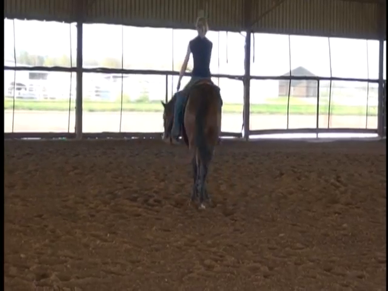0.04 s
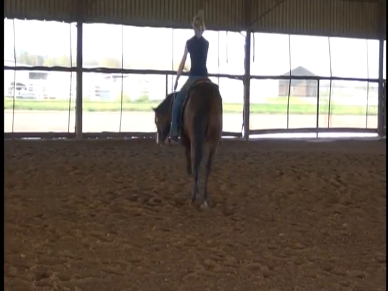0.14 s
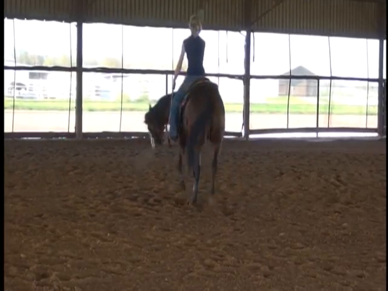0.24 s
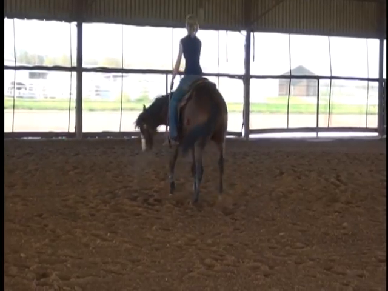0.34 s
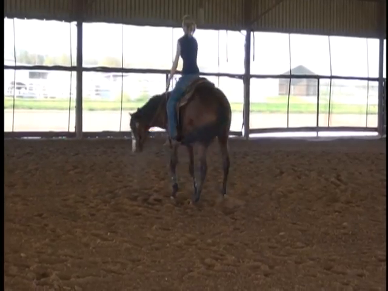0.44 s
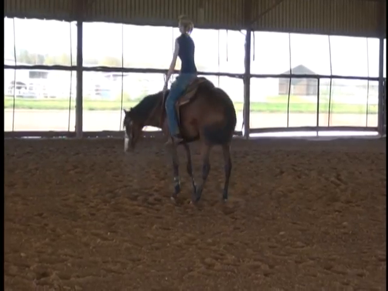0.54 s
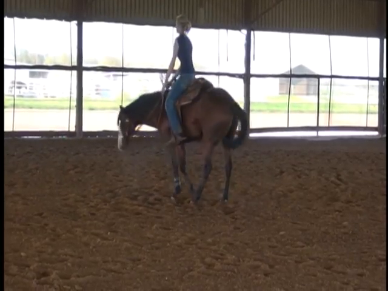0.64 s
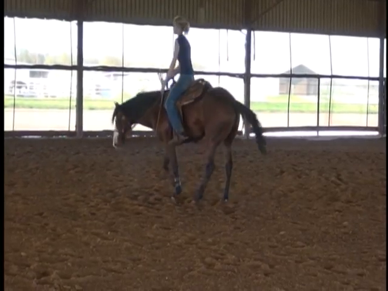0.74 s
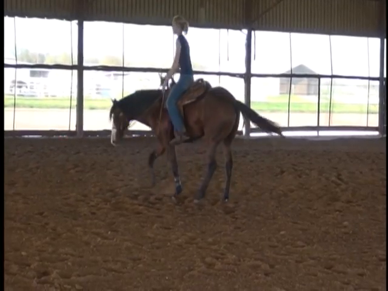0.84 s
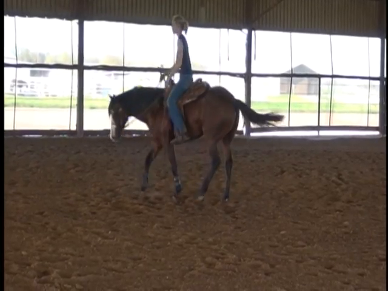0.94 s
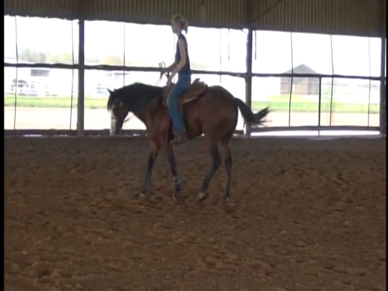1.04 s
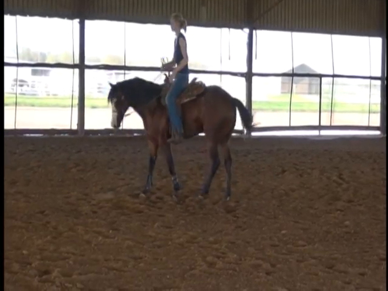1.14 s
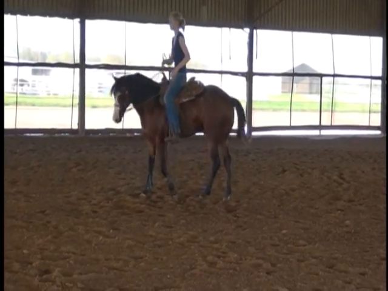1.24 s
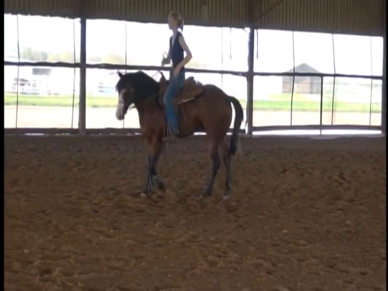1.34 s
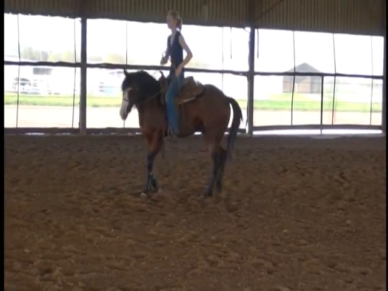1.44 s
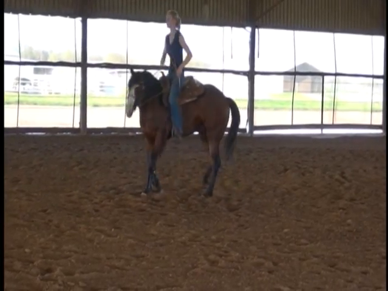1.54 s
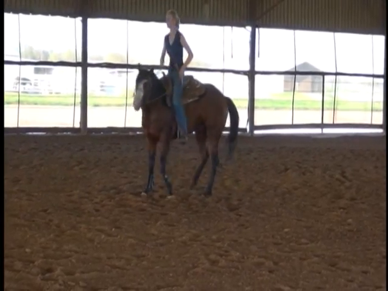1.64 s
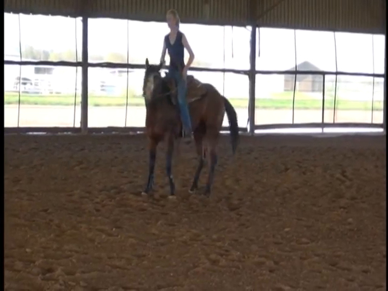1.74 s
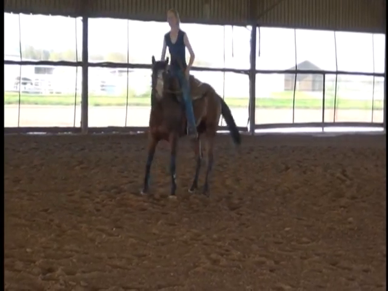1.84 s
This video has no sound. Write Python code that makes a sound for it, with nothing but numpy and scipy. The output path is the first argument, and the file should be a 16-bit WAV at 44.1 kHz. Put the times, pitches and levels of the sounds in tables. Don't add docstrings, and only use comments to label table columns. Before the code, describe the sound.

One rapid, rattling horse snort with a short roof echo, heard from several metres in a covered arena. Quiet bit and buckle clinks come before and after, with faint sparrow chirps later over low traffic and wind.

```python
import sys
import numpy as np
from scipy import signal
from scipy.fft import rfft, irfft
from scipy.io import wavfile
from scipy.ndimage import uniform_filter1d, map_coordinates

SR = 44100
rng = np.random.default_rng(int(sys.argv[2]) if len(sys.argv) > 2 else 0)


def output_pcm(signal):
    pcm = np.clip(np.atleast_2d(signal).T, -1, 1) * 32767
    wavfile.write(sys.argv[1], SR, np.round(pcm).astype(np.int16))


def to_linear_factor(level_db):
    exponent = np.asarray(level_db, float) / 20
    return 10 ** exponent


N = 83790
T = np.arange(N) / SR

# pitch_hz, level_db (per Hz)
AIR_SPECTRUM = [(15, -14), (25, -16.5), (134, 3), (427, -5.5), (591, -1.5), (1160, 1.5), (4250, -21.5),
                (9840, -32.5), (16000, -26.5)]
# pitch_hz, width_hz, lift_db
AIR_RESONANCES = [(277, 62, -7), (6300, 440, 7.5), (9750, 2000, 0)]
# pitch_hz, level_db
AIR_SIDE_SPECTRUM = [(60, -47), (110, -62), (200, -40), (380, -26.5), (700, -15.5), (1290, -11.5),
                     (2380, -10), (4400, -8), (8120, -4.5), (15000, -13)]
# pitch_hz, level_db
MIX_RESPONSE = [(30, -10), (55, 0), (15780, 0), (15900, -60)]
# pitch_hz, level_db
MIC_SIDE_RESPONSE = [(100, -16), (250, -36), (600, -7.5), (1500, 1), (5000, 6), (9000, 0)]
# pitch_hz, t60_s
ARENA_DECAY = [(120, 1.06), (250, 0.93), (600, 1.02), (1500, 0.43), (4000, 0.89), (7000, 0.31),
               (10000, 0.068)]
# start_s, length_s, level_db, start_hz, end_hz
SPARROW_CHIRPS = [(1.049, 0.013, -68, 4160, 4100), (1.053, 0.02, -68.5, 4140, 3590),
                  (1.11, 0.029, -71, 3140, 3000), (1.16, 0.019, -72, 3570, 3420),
                  (1.552, 0.014, -72, 3730, 3770), (1.71, .015, -74, 4230, 4250),
                  (1.729, 0.013, -72, 3570, 3450), (1.775, .022, -67, 4040, 3840),
                  (1.797, 0.016, -63.5, 3500, 3400), (1.81, 0.029, -74, 2500, 3280),
                  (1.838, 0.023, -68, 3250, 4450), (1.86, 0.017, -66, 4470, 4500),
                  (1.88, .015, -61.5, 3800, 3470), (1.892, .012, -66, 3500, 2800),
                  (1.79, 0.14, -76.5, 5330, 5460), (1.845, 0.0085, -67, 2960, 2800)]
# pitch_hz, t60_s
BIT_RINGS = [(5950, 0.13), (9110, 0.034), (11540, 0.13), (12650, 0.043)]
# start_s, (level_db of each ring)
BIT_JINGLES = [(0.161, -64, -60, -59, -63), (0.202, -83, -62, -63, -86), (0.675, -85, -64, -75, -88),
               (.715, -85, -85, -83, -88), (.75, -91, -90, -83, -88), (.785, -68, -63.5, -78, -76),
               (.898, -77, -70, -77, -91), (.908, -97, -63, -78, -74), (1.42, -91, -72, -86, -83),
               (1.79, -88, -71, -84, -88), (1.83, -81, -75, -71, -88), (1.86, -88, -88, -72, -88),
               (1.886, -86, -88, -70, -88)]
# start_s, level_db, low_ring_hz, high_ring_hz, rattle_s
TACK_TICKS = [(.0857, -62, 4940, 8950, 0.0077), (0.089, -57, 5800, 8500, 0.0022),
              (.095, -65.5, 5070, 6000, 0.021), (.988, -73, 5900, 9500, 0.0022),
              (1.1857, -52.5, 6200, 11800, 0.0016), (1.1864, -55.5, 11800, 12000, 0.0019),
              (1.186, -60, 4660, 9000, 0.0022), (1.188, -68, 8100, 14200, .0015),
              (1.19, -81, 6360, 11900, 0.051), (1.24, -75, 5060, 6160, 0.048),
              (1.565, -77, 3200, 5600, .03), (1.661, -65, 6300, 11600, 0.0049),
              (1.669, -67, 6300, 9150, 0.005), (1.705, -74.5, 6300, 5200, 0.13),
              (1.72, -67, 6350, 9400, 0.0085), (1.742, -71, 6040, 5230, 0.024),
              (1.83, -71, 6500, 7400, .003)]
# time_s, peak_db, pitch_hz
RIM_CRACKS = [(0.2049, -37, 1320), (0.2154, -23.5, 1940), (0.2468, -27.5, 1270), (0.2861, -19.5, 1730),
              (0.3098, -23, 1650), (0.3199, -17, 1410), (0.3348, -28, 1540), (0.36, -18, 1480),
              (0.3854, -16.5, 1800), (0.4121, -22.5, 1630), (0.4394, -22, 1440), (0.4522, -20.5, 980),
              (0.4651, -18.5, 1160), (0.4932, -20, 1260), (0.5227, -18.5, 1520), (0.5527, -29, 1370),
              (0.5807, -29, 1040), (0.5881, -28, 1180), (0.6078, -39, 1180), (0.6173, -25.5, 1360),
              (0.6453, -37, 1220), (0.6832, -38, 1140), (0.6931, -32, 1280)]
# time_s, peak_db, pitch_hz, length_s
WET_SPITS = [
    (0.232, -55.5, 9600, 0.0028),
    (0.347, -41, 7200, 0.0014),
    (.422, -44.5, 7300, 0.0012),
    (0.53, -49, 4860, 0.0023),
    (0.558, -48.5, 5000, 0.0015),
    (0.653, -53, 4670, 0.0029),
    (0.567, -44, 8400, 0.0011),
    (.686, -65, 7900, 0.0019),
    (.687, -59.5, 11000, 0.0026),
    (.696, -59, 7200, 0.002),
]
# time_s, effort_db, jet_brightness_db, chest_db, chest_deep_db
BLOW_COURSE = [
    (0.159, -65, 2, -24, 6.5),
    (0.191, -47.5, -8, -20, 2),
    (0.23, -39.5, -4.5, -18, 2.5),
    (0.281, -36.5, -1, -16.5, 0.5),
    (.46, -39.5, 1.5, -12.5, -2),
    (.55, -40.5, 2, -11.5, -3),
    (0.626, -42, 2.5, -13.5, -3.5),
    (0.689, -55.5, 0.5, -7.5, -6),
    (0.739, -62, -15, 0, -1.5),
]
# time_s, flaps_per_s
FLAP_RATE = [(.15, 40.5), (.42, 39), (.51, 33), (.75, 31.5)]
# time_s, share of full flutter depth
NOSTRIL_LOOSENESS = [(.2, .35), (.3, .65), (.44, .75), (.48, 1.15), (.7, .95)]
# time_s, delay_ms
JET_ECHO_DELAY = [(.2, 0.36), (.37, 0.3), (.7, 0.302)]
# pitch_hz, level_db (per Hz)
NOSE_SPECTRUM = [(150, -52), (300, -9.5), (559, -12), (823, -3.5), (1170, -4), (2400, -7), (4000, -25),
                 (8800, -83)]
# pitch_hz, width_hz, lift_db
NASAL_CAVITIES = [(379, 73, -0.5), (480, 100, 4), (744, 23, 7.5), (838.4, 33, 8), (1040, 90, 4),
                  (1171, 73, 9.5), (1458, 80, 6), (1650, 60, 4), (2256, 74, 4)]
# pitch_hz, level_db (per Hz)
JET_SPECTRUM = [(1500, -8), (3000, 0.5), (5000, -3.5), (8500, -6), (11500, -7), (14000, -18), (16000, -23)]
# pitch_hz, width_hz, lift_db
JET_RESONANCES = [(4830, 610, 1.5), (8800, 370, 5.5)]
# pitch_hz, width_hz, level_db
CHEST_RESONANCES = [(107, 42, -7), (140.4, 23.4, 0), (163, 27, 3.5), (252, 45, 4)]


def unit(x):
    return x / np.sqrt(np.mean(x ** 2))


def noise():
    return rng.standard_normal(N)


def on_log(hz, table):
    table = np.array(table)
    return np.interp(np.log(hz), np.log(table[:, 0]), table[:, 1])


def colour(x, table, lifts=()):
    hz = np.arange(4097) * SR / 8192 + 1
    gain_db = on_log(hz, table)
    for centre, width, db in lifts:
        gain_db = gain_db + db / (1 + (2 * (hz - centre) / width) ** 2)
    cepstrum = irfft(gain_db * np.log(10) / 20)
    cepstrum[1:4096] *= 2
    cepstrum[4097:] = 0
    impulse = irfft(np.exp(rfft(cepstrum)))[:4096]
    return signal.fftconvolve(x, impulse)[:N]


def ring(x, hz, width_hz):
    return signal.lfilter(*signal.iirpeak(hz, hz / width_hz, SR), x)


def ring_twice(x, hz, width_hz):
    return ring(ring(x, hz, width_hz), hz, width_hz)


def walk(rate):
    k = int(SR / rate)
    steps = np.repeat(rng.standard_normal(N // k + 1), k)
    return 1.3 * uniform_filter1d(uniform_filter1d(steps, k), k)[:N]


def pulse(time_s, length_s):
    return np.exp(-((T - time_s) / length_s) ** 2)


def air():
    level_db, swell_db, flicker_db = -58.5, .5, 1.1
    steady = unit(colour(noise(), AIR_SPECTRUM, AIR_RESONANCES))
    swell = walk(0.67)
    mid = np.zeros(N)
    for hz in 30 * 2 ** np.arange(0, 9.4, .5):
        mid += ring(steady, hz, hz * .5) * to_linear_factor(swell_db * swell + flicker_db * walk(9.8))
    side = colour(unit(colour(noise(), AIR_SPECTRUM)), AIR_SIDE_SPECTRUM)
    return to_linear_factor(level_db) * np.array([unit(mid), side])


def camera():
    line_hz, field_hz, buzz_start_s = 15734, 59.94, 0.0096
    whine_db, buzz_db, hum_db = -87, -84, -78
    gate = np.exp(-((T - buzz_start_s) * field_hz % 1) / 0.17)
    buzz = unit(ring_twice(gate * noise(), 15500, 630))
    whine = np.sin(2 * np.pi * line_hz * T) * (1 + 0.98 * gate)
    hum = np.sin(2 * np.pi * field_hz * T)
    return to_linear_factor(whine_db) * whine + to_linear_factor(buzz_db) * buzz + to_linear_factor(hum_db) * hum


def arena(x):
    wet_db, side_db, predelay_s = -9, -15, 0.016
    tail = 0
    for hz in 88 * 2. ** np.arange(8):
        band = ring(rng.standard_normal((2, N)), hz, hz * .8)
        tail = tail + band * to_linear_factor(-60 * T / on_log(hz, ARENA_DECAY))
    tail = tail * (T > predelay_s)
    tail = tail / np.sqrt(np.sum(tail[0] ** 2))
    echo = signal.fftconvolve(x[None], tail, axes=1)[:, :N]
    return echo * to_linear_factor(np.array([[wet_db], [wet_db + side_db]]))


def sparrows():
    out = np.zeros(N)
    for start, length, db, start_hz, end_hz in SPARROW_CHIRPS:
        progress = np.clip((T - start) / length, 0, 1)
        hz = start_hz + (end_hz - start_hz) * progress + 30 * walk(270)
        whistle = np.sin(2 * np.pi * np.cumsum(hz) / SR)
        out += to_linear_factor(db + 2.1 * walk(200)) * np.sin(np.pi * progress) ** 0.15 * whistle
    return out


def tack():
    out = np.zeros(N)
    for start, *levels_db in BIT_JINGLES:
        age = np.clip(T - start, 0, None)
        attack = (T > start) * np.minimum(age / .0012, 1)
        for (hz, t60), db in zip(BIT_RINGS, levels_db):
            out += attack * to_linear_factor(db - 60 * age / t60 + 4.7 * walk(110)) * np.sin(2 * np.pi * hz * age)
    for start, db, low_hz, high_hz, rattle in TACK_TICKS:
        burst = noise() * (T > start) * np.exp(-np.clip(T - start, 0, None) / rattle)
        tick = 0.39 * ring_twice(burst, 9800, 9000)
        tick += 4.0 * ring_twice(burst, low_hz, 1100)
        tick += 2.8 * ring_twice(burst, high_hz, 1600)
        out += to_linear_factor(db) * tick
    return out


def cracks():
    crack_db, crack_turns = -3, .55
    out = np.zeros(N)
    for time, db, hz in RIM_CRACKS:
        out += to_linear_factor(db + crack_db) * pulse(time, crack_turns / hz) * np.cos(2 * np.pi * hz * (T - time))
    hiss = noise()
    for time, db, hz, length in WET_SPITS:
        out += to_linear_factor(db) * pulse(time, length) * unit(ring_twice(hiss, hz, 2600))
    return out


def sputter():
    drops_per_s, level_db, spread_db = 900, -4, 2.5
    chance = rng.random((3, N))
    drops = (chance[0] < drops_per_s / SR) * to_linear_factor(-spread_db * np.log(chance[1])) * np.sign(chance[2] - .5)
    return to_linear_factor(level_db) * unit(drops)


def nose_puffs(puff, effort):
    pinch_hz, pinch_db, pinch_from_s, pinch_to_s = 1000, -5, .2, 0.29
    bunch_s, bunch_lead_s, bunch_db = 0.0038, 0.0039, 21
    nose = unit(colour(puff, NOSE_SPECTRUM + [(16000, -120)], NASAL_CAVITIES))
    lows = signal.sosfilt(signal.butter(2, pinch_hz, fs=SR, output="sos"), nose)
    nose = nose - lows * (1 - to_linear_factor(np.interp(T, [pinch_from_s, pinch_to_s], [pinch_db, 0])))
    bunching = np.zeros(N)
    for time, db, _ in RIM_CRACKS:
        bunching += to_linear_factor(db + bunch_db) / effort * to_linear_factor(-42) * pulse(time - bunch_lead_s, bunch_s)
    return nose * (1 + bunching * 0.24)


def chest_rumble(breath, deep_db):
    wobble_db = 3
    chest = np.zeros(N)
    for hz, width, db in CHEST_RESONANCES:
        level_db = db + deep_db * (hz < 200) + wobble_db * walk(24.8)
        chest += to_linear_factor(level_db) * unit(ring(ring(breath, hz, width), hz, 2 * width))
    return unit(chest)


def air_jet(rush, bright_db):
    echo_share, split_hz, top_hz, patchy_db = .55, 6000, 13400, 1.3
    jet = colour(rush, JET_SPECTRUM, JET_RESONANCES)
    delay_s = np.interp(T, *np.array(JET_ECHO_DELAY).T) / 1000
    jet = unit(jet - echo_share * map_coordinates(jet, [(T - delay_s) * SR], mode="mirror"))
    low = signal.sosfiltfilt(signal.butter(4, split_hz, fs=SR, output="sos"), jet)
    most = signal.sosfiltfilt(signal.butter(4, top_hz, fs=SR, output="sos"), jet)
    out = to_linear_factor(patchy_db * walk(69.6)) * low
    out += to_linear_factor(bright_db + patchy_db * walk(69.6)) * (most - low)
    out += to_linear_factor(2 * bright_db + patchy_db * walk(69.6)) * (jet - most)
    return out


def snort():
    shut_s, shut_share, swell_power = .4655, .2, 2.2
    flutter_low_db, flutter_high_db, ragged_db, jet_db = 8, 13, 1.7, -12.5
    slap_db, slap_scatter_db, slap_s = -3, 2, .0025
    second_db, second_turn = -4, .5
    pop_s, pop_length_s, pop_db, pop_hz = 0.2145, 0.007, -2, 2600

    time, effort_db, bright_db, chest_db, deep_db = np.array(BLOW_COURSE).T
    effort = to_linear_factor(np.interp(T, time, effort_db, left=-120, right=-120))
    flaps_per_s = np.interp(T, *np.array(FLAP_RATE).T)
    turns = np.cumsum(flaps_per_s) / SR
    turns = turns - np.interp(shut_s, T, turns)
    phase = turns % 1
    closing = 1 - phase / shut_share
    swelling = np.abs((phase - shut_share) / (1 - shut_share)) ** swell_power
    opening = np.where(phase < shut_share, closing, swelling) - .5
    opening = opening * np.interp(T, *np.array(NOSTRIL_LOOSENESS).T)

    def slap_bump(turn):
        away_s = ((turns - turn + .5) % 1 - .5) / flaps_per_s
        return np.exp(-(away_s / slap_s) ** 2)

    puff_air, jet_air, slap_air, breath = rng.standard_normal((4, N))
    drops = sputter()
    slaps = slap_bump(0) * to_linear_factor(ragged_db * walk(42.8))
    slaps += slap_bump(second_turn) * to_linear_factor(second_db + slap_scatter_db * walk(41.0))
    puff = unit((puff_air + drops) * to_linear_factor(flutter_low_db * opening + ragged_db * walk(151.6)))
    puff = puff + to_linear_factor(slap_db) * unit(slaps * slap_air)
    nose = nose_puffs(puff, effort)
    chest = chest_rumble(breath, np.interp(T, time, deep_db))
    gust = to_linear_factor(flutter_high_db * opening + ragged_db * walk(120.1)) + 0.28 * slap_bump(second_turn)
    jet = air_jet((jet_air + drops) * gust, np.interp(T, time, bright_db))
    pop = to_linear_factor(pop_db) * pulse(pop_s, pop_length_s) * unit(ring_twice(breath, pop_hz, 2100))
    blow = pop + nose + to_linear_factor(np.interp(T, time, chest_db)) * chest + to_linear_factor(jet_db) * jet
    return effort * blow + cracks()


def scene():
    backdrop, birds, small, horse = air(), sparrows(), tack(), snort()
    echo = arena(horse + .5 * small + 0.78 * birds)
    mid = colour(backdrop[0] + echo[0] + horse + small + 0.88 * birds + camera(), MIX_RESPONSE)
    off_centre = echo[1] + 0.055 * horse + 0.077 * small + 0.13 * birds
    side = colour(backdrop[1] + colour(off_centre, MIC_SIDE_RESPONSE), MIX_RESPONSE)
    return np.array([mid + side, mid - side])


def roll_off(x):
    return signal.sosfilt(signal.butter(12, 16380, fs=SR, output="sos"), x)


def record(dry):
    return roll_off(dry)


dry = scene()
out = record(dry)
output_pcm(out)
```